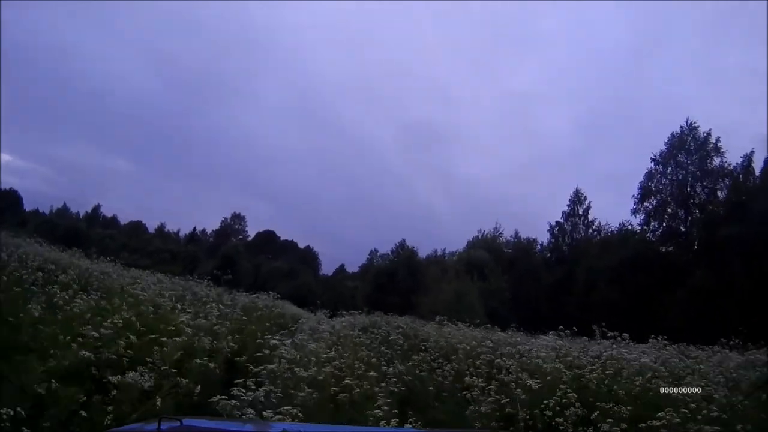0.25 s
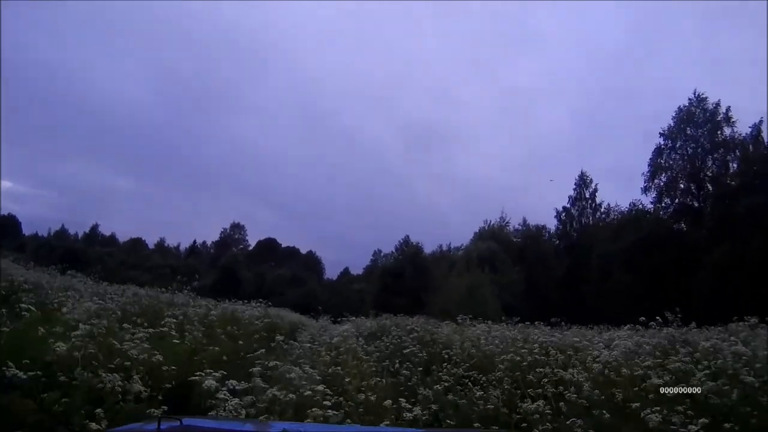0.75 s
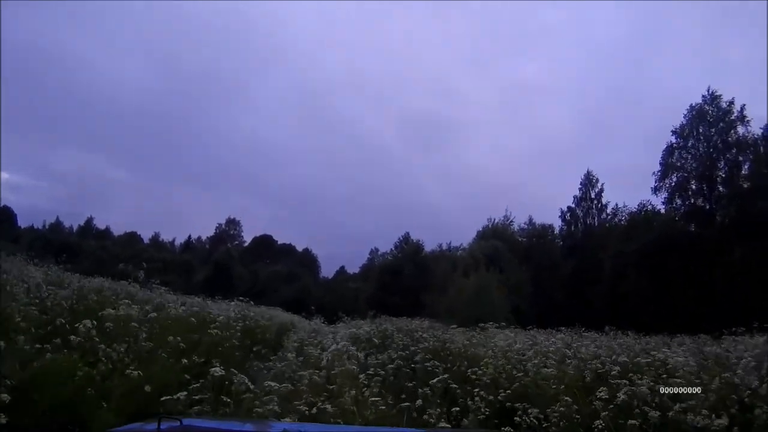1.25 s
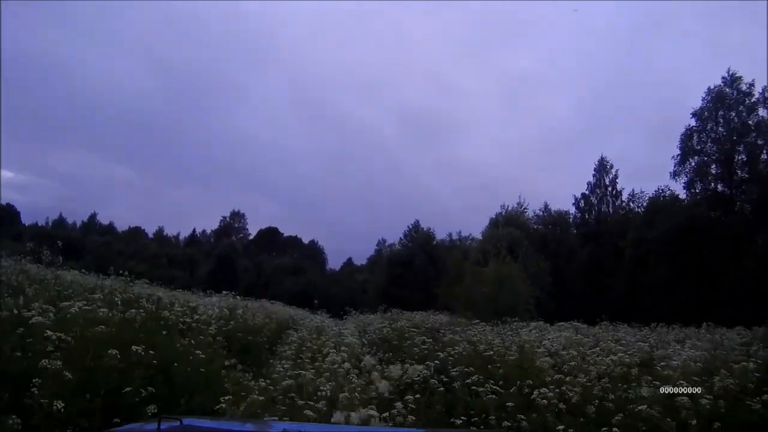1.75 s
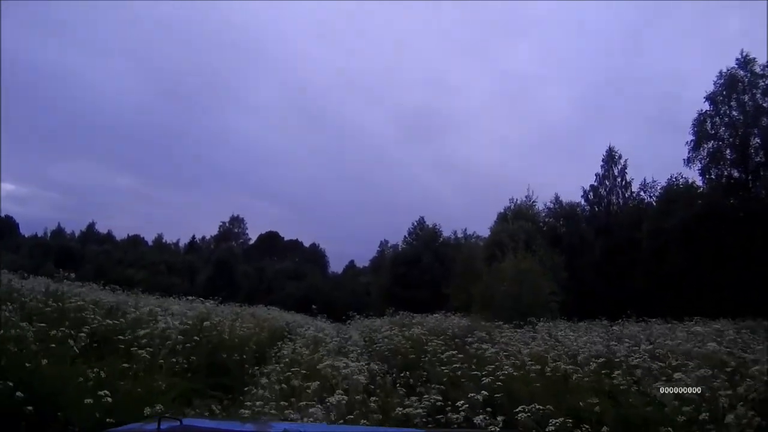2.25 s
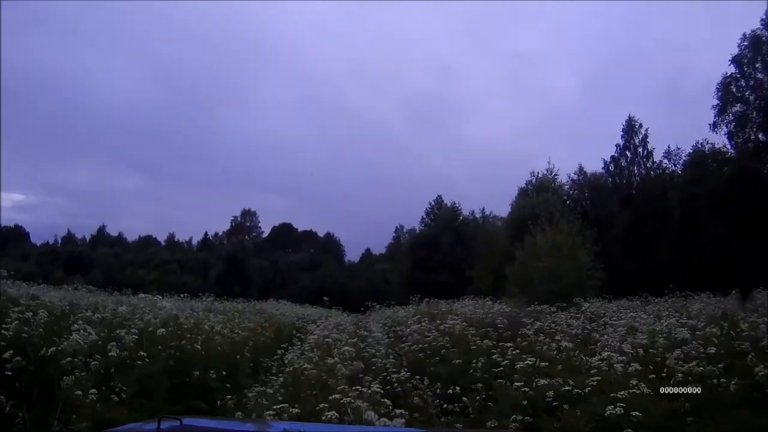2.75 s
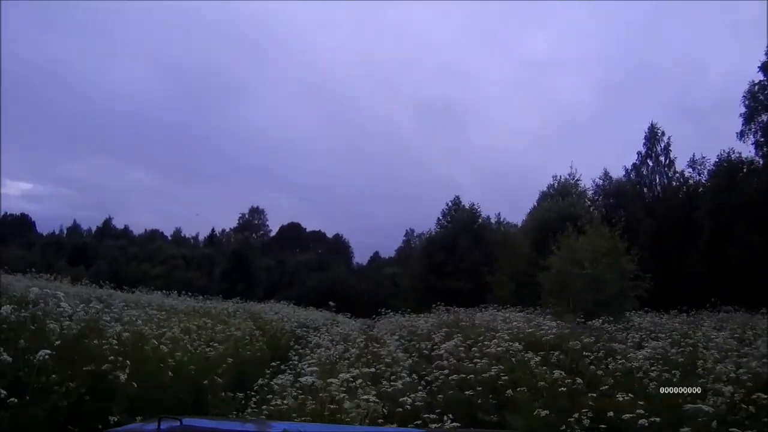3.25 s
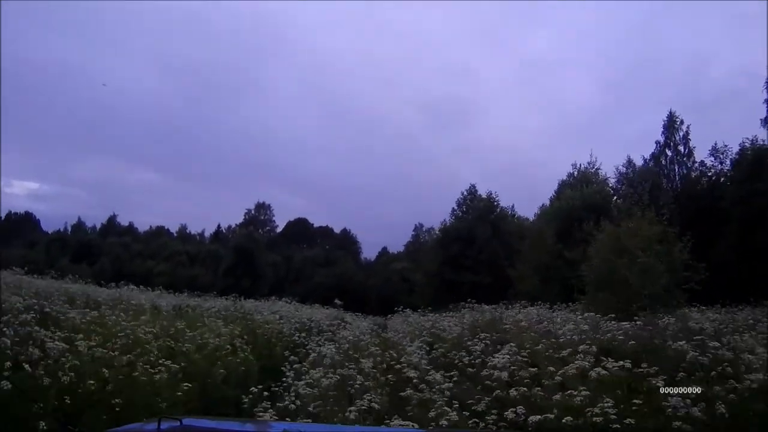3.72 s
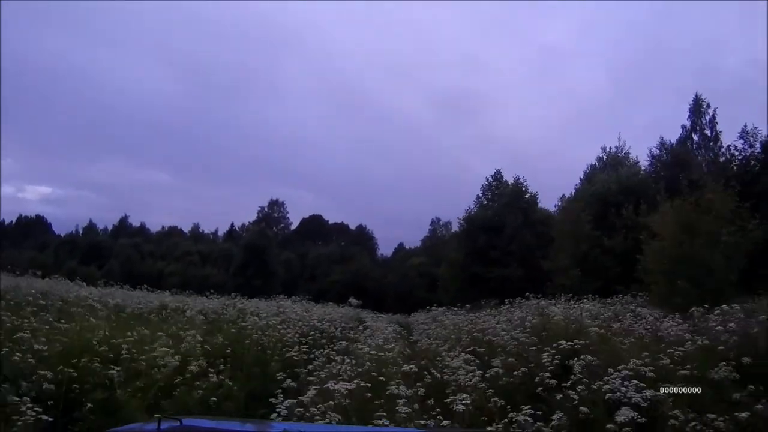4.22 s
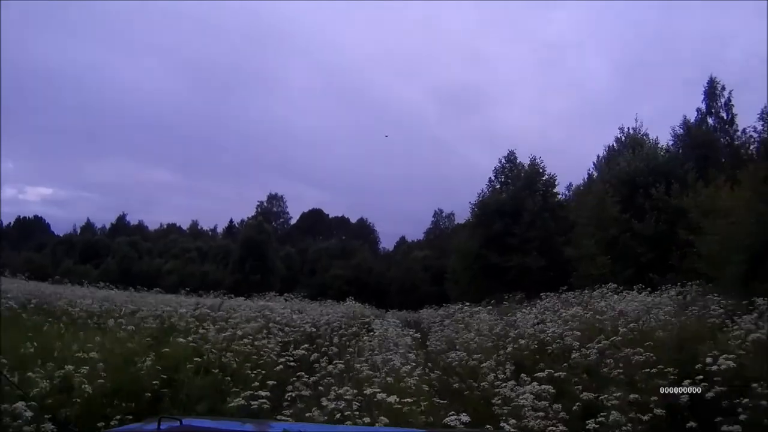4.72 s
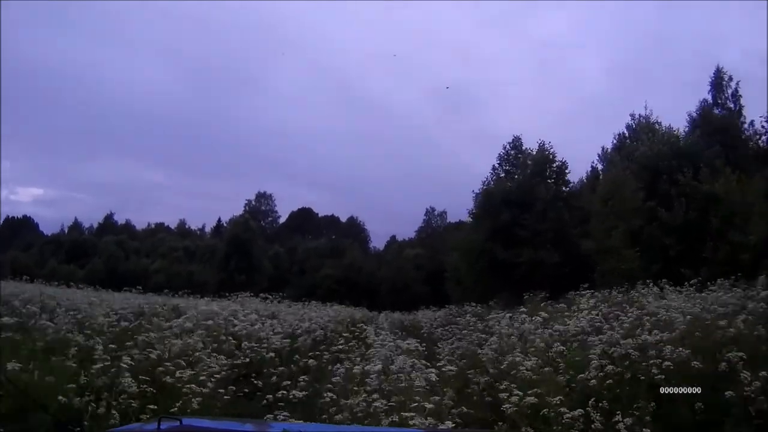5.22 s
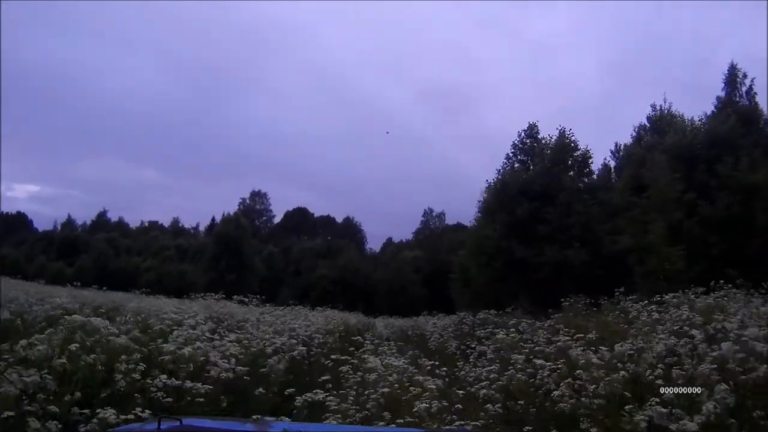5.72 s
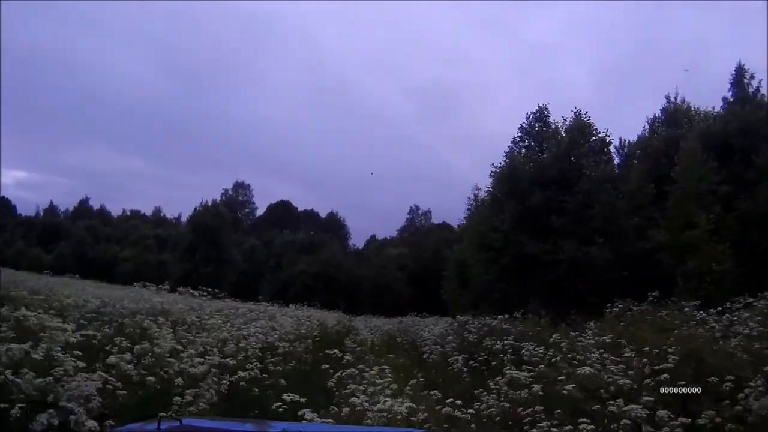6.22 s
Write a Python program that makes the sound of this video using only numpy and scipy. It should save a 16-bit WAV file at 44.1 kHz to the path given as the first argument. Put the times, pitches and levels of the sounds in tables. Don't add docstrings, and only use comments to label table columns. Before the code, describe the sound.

Heard from the dashboard of a car creeping through a weedy field: a loud, low four-cylinder boom with buzzing panels. The note sags and the boom briefly drops out at ruts, then recovers and climbs modestly. Dull thuds hit the floor throughout, stalks tick against metal, loose trim rattles, and faint grass hiss and gear whine sit behind. The close microphone overloads on peaks.

```python
import sys
import numpy as np
from scipy import signal
from scipy.fft import rfft, irfft, next_fast_len
from scipy.io import wavfile

SR = 44100
rng = np.random.default_rng(int(sys.argv[2]) if len(sys.argv) > 2 else 0)


def nominal_scale(level):
    x = np.asarray(level, float) / 20
    return 10 ** x


def inscribe(sig):
    pcm = np.round(np.clip(np.atleast_2d(sig).T, -1, 1) * 32767)
    wavfile.write(sys.argv[1], SR, pcm.astype(np.int16))


N = 285327


def in_time(rows):
    s, value = np.transpose(rows)
    return np.interp(np.arange(N) / SR, s, value)


def rms_one(x):
    return x / np.sqrt(np.mean(x ** 2) + 1e-20)


def drift(rate):
    r = np.exp(-80 * np.pi * rate / SR)
    white = rng.standard_normal(N // 40 + 2002)
    slow = signal.lfilter([1], [1, -2 * r, r * r], white)[2000:]
    return np.interp(np.arange(N) / 40, np.arange(len(slow)), rms_one(slow))


def resonance(x, hz, width_hz):
    r = np.exp(-np.pi * width_hz / SR)
    zeros = np.array([1, 0, -1]) * (1 - r * r) / 2
    return signal.lfilter(zeros, [1, -2 * r * np.cos(2 * np.pi * hz / SR), r * r], x)


def narrow_band(x, hz, width_hz):
    return rms_one(resonance(resonance(x, hz, width_hz), hz, width_hz))


def resonances(x, modes):
    total = 0
    for k, (hz, width_hz, db) in enumerate(modes):
        total = total + (-1) ** k * nominal_scale(db) * resonance(x, hz, width_hz)
    return rms_one(total)


def coloured(spectrum, patchy_db, rate):
    hz, level_db = np.transpose(spectrum)
    edges = np.geomspace(hz[0], hz[-1], int(3 * np.log2(hz[-1] / hz[0])) + 1)
    white, out = rng.standard_normal((2, N)), 0
    for k, (low, high) in enumerate(zip(edges, edges[1:])):
        sos = signal.butter(2, [low, high], "band", fs=SR, output="sos")
        band = signal.sosfilt(sos, white[k % 2])
        centre_db = np.interp(np.log(low * high) / 2, np.log(hz), level_db)
        out = out + band * nominal_scale(centre_db + patchy_db * drift(rate))
    return rms_one(out)


def by_speed(db_at_50, db_per_firing, rate):
    return db_at_50 + db_per_firing * (rate - 50)


def dips(times, depths, onset_s, recovery_s, order):
    out = np.zeros(N // 40 + 2)
    for s, depth in zip(times, depths):
        late = np.arange(len(out)) * 40 / SR - s
        out += depth * np.exp(-np.abs(late / np.where(late < 0, onset_s, recovery_s)) ** order)
    return np.interp(np.arange(N) / 40, np.arange(len(out)), out)


# [t/s, f/Hz of firing]
THROTTLE = [(0.0, 48.6), (0.12, 49.7), (0.75, 51.8), (1.04, 49.9), (1.4, 49.7), (1.72, 48.2), (2.02, 50.3),
            (2.33, 51.4), (2.9, 52.6), (3.24, 50.0), (3.52, 53.9), (3.86, 53.9), (4.13, 52.9), (4.28, 56.9),
            (4.45, 55.4), (4.7, 57.5), (5.08, 57.9), (6.47, 57.3)]
# [t/s, f/Hz of firing lost]
SAGS = [(0.3, 4.5), (0.63, 1.4), (0.86, 3.7), (1.13, 3.5), (1.54, 1.5), (1.63, -0.7), (1.88, 1.1),
        (2.15, 3.0), (2.44, 3.0), (2.65, 3.8), (3.03, 2.0), (3.71, 1.7), (3.94, 0.5), (4.17, -0.9),
        (4.55, 1.3), (4.87, 0.7), (5.02, -0.8), (5.15, 1.0), (5.43, -0.9), (5.99, 1.0), (6.37, -0.5)]


def firing_rate():
    return in_time(THROTTLE) - dips(*np.transpose(SAGS), onset_s=.06, recovery_s=.11, order=2)


# [t/s, loss level/dB]
RUTS = [(.32, 7), (.42, 2.5), (.62, 6.5), (.88, 23), (1.16, 17), (1.25, 5.5), (1.551, 8), (1.64, 7),
        (1.889, 13), (2.16, 11), (2.45, 9), (2.67, 8.5), (3.08, 12.5), (3.73, -0.5), (3.95, 4.5),
        (4.17, 2.5), (4.61, 5), (5.031, 5.5), (5.44, 2), (5.84, 5), (6.02, 5), (6.16, 5.5), (6.38, 6)]


def rut_loss():
    return dips(*np.transpose(RUTS), onset_s=.027, recovery_s=.074, order=1)


# [t/s, level/dB]
LOAD = [(0, -20.5), (.12, -10.5), (.75, -9), (1.04, -9), (1.4, -9), (1.72, -11), (2.02, -12), (2.33, -8),
        (2.9, -9), (3.24, -11), (3.86, -8.5), (4.2, -8.5), (4.45, -7), (5.08, -8.5), (5.6, -7), (6.47, -4)]


def exhaust(turn, rate, pan_db, rut_db, shake_db):
    boom_db = in_time(LOAD) - rut_db
    second_db = by_speed(-14, -0.065, rate) - 0.3 * rut_db - shake_db
    fourth_db = by_speed(-23.5, -0.24, rate) - 0.5 * shake_db
    sixth_db = pan_db - 2.0 - (rate - 44.5)
    boom_lag = 2.2 + .11 * (rate - 50)
    fourth_lag = .6 - .25 * (rate - 50)
    boom = nominal_scale(boom_db + 0.85 * drift(29)) * np.cos(turn - boom_lag)
    second = nominal_scale(second_db + 1.85 * drift(58)) * np.cos(2 * turn)
    fourth = nominal_scale(fourth_db - 1.0 + drift(5.8)) * np.cos(4 * turn - fourth_lag)
    sixth = nominal_scale(sixth_db + 0.82 * drift(8)) * np.cos(6 * turn)
    eighth = nominal_scale(-47.5 + 3 * drift(9)) * np.cos(8 * turn + .5 * drift(9))
    half = nominal_scale(boom_db - 23.0) * np.cos(turn / 2)
    return np.sqrt(2) * (boom + second + fourth + sixth + eighth + half)


PATHS_S = [.0023, .0037, .0061, .0089]


def through_frame(x, echo=0.68):
    size = next_fast_len(N + SR)
    w = 2 * np.pi * np.fft.rfftfreq(size, 1 / SR)
    response = 1
    for s in PATHS_S:
        delay = np.exp(-1j * w * s)
        response = response * (delay - echo) / (1 - echo * delay)
    return irfft(rfft(x, size) * response, size)[:N]


CYLINDERS = [0, -7]
# [f/Hz, width/Hz, level/dB]
PANELS = [
    (303, 28.3, -6),
    (468, 16, 3),
    (620.4, 24, 13),
    (769.3, 45, 0),
]


def panels(turn, rate, rut_db):
    cycle = np.floor(turn / (2 * np.pi)).astype(int)
    fired = np.diff(cycle, prepend=cycle[0]) > 0
    pulses = fired * nominal_scale(np.array(CYLINDERS)[cycle % 2] + .8 * rng.standard_normal(N))
    road = rng.standard_normal(N) * nominal_scale(0.3 * drift(21))
    drive = nominal_scale(9.0) * through_frame(rms_one(pulses)) + road
    upper_db = -3.5 - 1.5 * np.maximum(rate - 54.5, 0)
    upper = nominal_scale(upper_db) * resonances(drive, PANELS[3:4])
    sing_db = 3.0 * np.exp(-((rate - 50.8) / 1.37) ** 2)
    buzz_db = by_speed(-36.5, -0.25, rate) + sing_db - 0.53 * rut_db
    return nominal_scale(buzz_db - 2.0) * (resonances(drive, PANELS[1:3]) - upper)


# [t/s, peak level/dB, f/Hz, exhaust loss level/dB]
THUDS = [(0.014, -10, 135, -0.5), (0.29, -11.5, 147, 5.5), (0.625, -12, 146, 3), (0.811, -15, 130, -1),
         (1.114, -10, 139.4, -2), (1.392, -11.5, 140, -2), (1.488, -18, 147, 6.5), (2.289, -14, 137, 2),
         (2.366, -11, 140, -0.5), (2.609, -10.5, 139, 2), (2.85, -16, 143, 1), (3.005, -15, 134, 2),
         (3.281, -14, 138, 4.5), (3.699, -13.5, 162, 7.5), (4.112, -9, 128, 1.5), (4.163, -19, 152, 7),
         (4.302, -15, 144, 1.5), (4.363, -14.5, 167, 2.5), (4.511, -14, 144, 3), (4.72, -9.5, 133.6, 2),
         (4.868, -18, 150.5, 7.5), (4.931, -7.5, 119.4, 1), (5.026, -14.5, 127, -0.5),
         (5.133, -11.5, 135.2, 0.5), (5.42, -12, 132.9, -2.5), (5.546, -7, 129, 4), (5.824, -12, 144, 4),
         (6.111, -14.5, 139, 11), (6.208, -17.5, 156, 8), (6.282, -10, 132.4, 6.5)]


def thuds(rise_s=0.0051, ring_s=0.012):
    out, t = np.zeros(N + SR), np.arange(SR // 8) / SR
    shape = (1 - np.exp(-t / rise_s)) ** 2 * np.exp(-t / ring_s)
    for s, db, hz, _ in THUDS:
        body = np.sin(2 * np.pi * hz * t) + 0.63 * np.sin(2 * np.pi * 1.266 * hz * t)
        out[round(s * SR):][:len(t)] -= nominal_scale(db + 1.2) * shape / shape.max() * body
    return out[:N]


def thud_shake():
    s, _, _, loss_db = np.transpose(THUDS)
    return dips(s + .03, loss_db, onset_s=.032, recovery_s=.055, order=2)


def floor_pan_level(rate, rut_db):
    return by_speed(-33, -0.99, rate) - 0.15 * rut_db + 0.87 * drift(3.8)


def floor_pan(pan_db):
    hz, width_hz, _ = PANELS[0]
    return nominal_scale(pan_db - 6.5) * narrow_band(rng.standard_normal(N), hz, width_hz)


# [f/Hz, level/dB per Hz]
RUMBLE = [(7.1, -38), (12, -23.5), (43, -5.5), (107, -1.5), (126, 1), (157, -10), (215, -8), (250, -8.5),
          (420, -61), (550, -80), (920, -120)]


def ground():
    rumble_db = -25 + 2.5 * drift(3.3)
    frame = nominal_scale(rumble_db) * narrow_band(rng.standard_normal(N), 35, 22)
    sway = nominal_scale(-29) * narrow_band(rng.standard_normal(N), 8, 12)
    road = nominal_scale(-27) * coloured(RUMBLE, patchy_db=2.5, rate=8)
    return frame + sway + road


# [t/s, peak level/dB, f/Hz, crack level/dB, share of dull knock]
TICKS = [(1.3483, -32, 2960, -18, .5), (1.7759, -32, 2990, -16, .5), (1.921, -18, 2900, -19.5, .6),
         (2.0492, -31, 2600, -22, .9), (2.165, -31, 3000, -23, .3), (2.3436, -29, 2330, -22, .3),
         (2.4074, -16.5, 2280, -30, .15), (2.4964, -28, 2210, -24, .5), (2.65, -31, 2500, -22, .6),
         (2.7237, -26.5, 2860, -22, .6), (3.271, -31, 2710, -18, .5), (3.456, -23, 2600, -24, .3),
         (4.3595, -30, 2880, -18, .5), (4.783, -30, 2540, -16, .5), (5.4745, -30, 2870, -19, .8),
         (5.5687, -27, 2660, -17, .5), (6.1035, -22.5, 2600, -18, .9)]


def ticks(rise_s=.0008, ring_s=.0035, crack_s=.0025, rough=.45):
    out, t = np.zeros(N + SR), np.arange(SR // 30) / SR
    noise = rng.standard_normal((len(TICKS), 3, len(t)))
    rise = 1 - np.exp(-t / rise_s)
    for (s, db, hz, crack_db, knock), (soft, dull, sharp) in zip(TICKS, noise):
        body = np.sin(2 * np.pi * hz * t) + rough * narrow_band(soft, hz, hz * .5)
        body += knock * narrow_band(dull, 1000, 1000)
        crack = nominal_scale(crack_db + 8.0) * narrow_band(sharp, 5200, 4500)
        tick = body * np.exp(-t / ring_s) + crack * np.exp(-t / crack_s)
        out[round(s * SR):][:len(t)] += nominal_scale(db) * rise * tick
    return signal.sosfilt(signal.butter(4, 8500, fs=SR, output="sos"), out[:N] + 1e-18)


# [f/Hz, level/dB per Hz]
HISS = [(330, -22.5), (500, 3.5), (800, -1), (1100, -9), (1500, -7.5), (1950, -10.5), (2900, -10),
        (3400, -20.5), (4800, -27), (6500, -29), (9000, -29.5), (11500, -37.5), (16000, -40.5)]
# [f/Hz, width/Hz, level/dB over the hiss]
BLOCK = [(1264, 8, 7), (1460, 260, 2.5), (2160, 87, -8), (2594, 100, -8), (3080, 145, 2), (3610, 610, -4.5),
         (4130, 110, 3), (4480, 66, -2), (5400, 220, 2), (6060, 92, 4.5), (6580, 410, 9), (7600, 130, 4),
         (8160, 270, 1.5), (8700, 200, 7), (9070, 290, 5), (10490, 410, 7), (13300, 430, 9),
         (15500, 300, 8)]


def clatter(turn, rate, rut_db, gate=0.066):
    puff = (1 + gate * np.cos(turn)) * nominal_scale(.9 * drift(20) + .4 * drift(6))
    hiss = coloured(HISS, patchy_db=-1.0, rate=21)
    ringing = sum(nominal_scale(db) * resonance(hiss, hz, width_hz) for hz, width_hz, db in BLOCK)
    clatter_db = by_speed(-36, 0.039, rate) - 0.017 * rut_db
    return nominal_scale(clatter_db) * puff * rms_one(hiss + ringing)


# [f/firing rate, level/dB]
GEARS = [
    (4.62, -38),
    (6.33, -42.5),
    (21.7, -57),
    (25.3, -55.5),
    (28.0, -47),
    (31.6, -51.5),
]


def gears(turn, rate):
    tones = []
    for order, db in GEARS:
        tones.append(nominal_scale(db + 3.75 * drift(10.6)) * np.cos(order * turn + 1.1 * drift(12.1)))
    tones[2] = tones[2] * nominal_scale(0.91 * (rate - 45))
    return sum(tones)


# [f/Hz, width/Hz, level/dB]
WHISTLE = [
    (2670, 70, -52),
    (2570, 100, -55),
]


def whistle(rate):
    fast = np.clip((rate - 54) / 2, 0, 1)
    bands = []
    for hz, width_hz, db in WHISTLE:
        bands.append(nominal_scale(db + 1.5 * drift(7.6)) * narrow_band(rng.standard_normal(N), hz, width_hz))
    at_low, at_high = bands
    return (1 - 1.4 * fast) * at_low + fast * at_high


# [t/s, peak level/dB]
CLICKS = [(1.4588, -39), (2.3752, -37), (2.5254, -46), (3.7356, -52), (4.1227, -47), (4.3552, -43),
          (4.5158, -42), (4.6949, -40), (4.7299, -39), (4.7478, -41), (4.9374, -45), (5.1459, -43),
          (5.1983, -39), (5.2681, -42), (5.3026, -43), (5.3719, -39), (5.558, -40), (5.5759, -44),
          (5.5929, -35), (5.784, -39), (5.9216, -41), (5.9566, -44), (6.1017, -45), (6.184, -42),
          (6.4455, -34), (6.126, -41)]


def clicks(die_s=0.001):
    out, t = np.zeros(N + SR), np.arange(SR // 200) / SR
    for (s, db), burst in zip(CLICKS, rng.standard_normal((len(CLICKS), len(t)))):
        out[round(s * SR):][:len(t)] += nominal_scale(db + 2.0) * burst * np.exp(-t / die_s)
    return signal.sosfilt(signal.butter(2, 5000, "high", fs=SR, output="sos"), out[:N] + 1e-18)


def rattle(per_s=45):
    sizes = nominal_scale(3.2 * np.minimum(rng.exponential(1, N), 4))
    hits = sizes * (rng.random(N) < per_s / SR) * rng.choice([-1, 1], N)
    return nominal_scale(-27) * (resonance(hits, 2900, 900) + 0.54 * resonance(hits, 7000, 5000))


def scene():
    rate = firing_rate()
    turn = 2 * np.pi * np.cumsum(rate) / SR
    rut_db = rut_loss()
    pan_db = floor_pan_level(rate, rut_db)
    engine = exhaust(turn, rate, pan_db, rut_db, thud_shake()) + panels(turn, rate, rut_db)
    engine += clatter(turn, rate, rut_db) + gears(turn, rate) + whistle(rate)
    chassis = thuds() + floor_pan(pan_db) + ground() + rattle()
    short_sounds = ticks() + clicks()
    return (engine + chassis + short_sounds)[None]


def top_cut(x):
    return signal.sosfilt(signal.butter(12, 15780, fs=SR, output="sos"), x)


def record(dry):
    clipped = np.clip(nominal_scale(0.27) * dry - .0066, -.995, .995)
    return top_cut(clipped)


dry = scene()
out = record(dry)
inscribe(out)
```